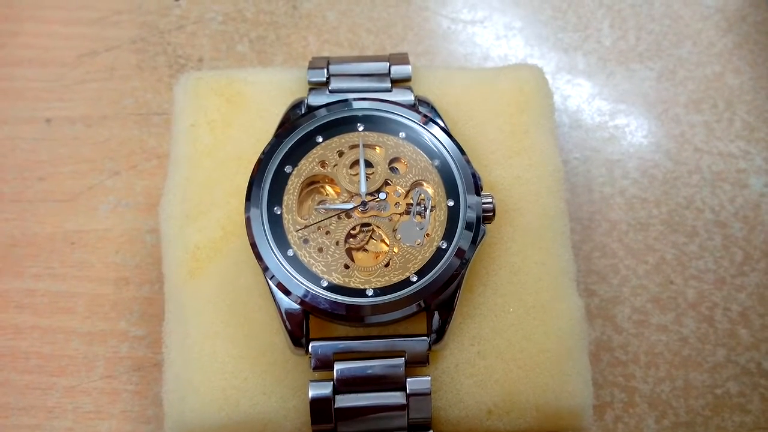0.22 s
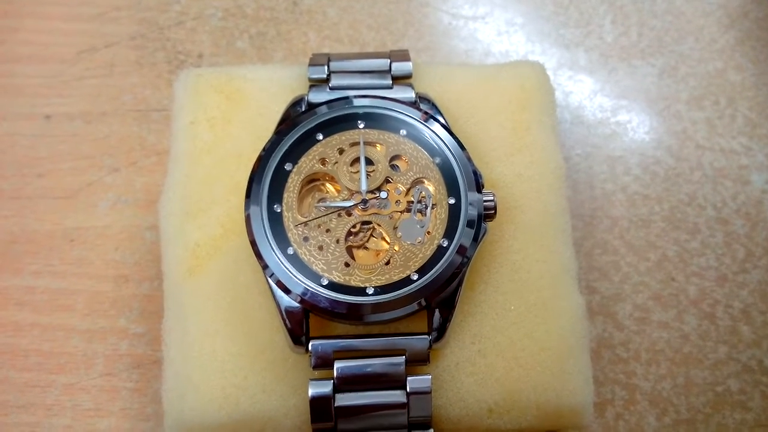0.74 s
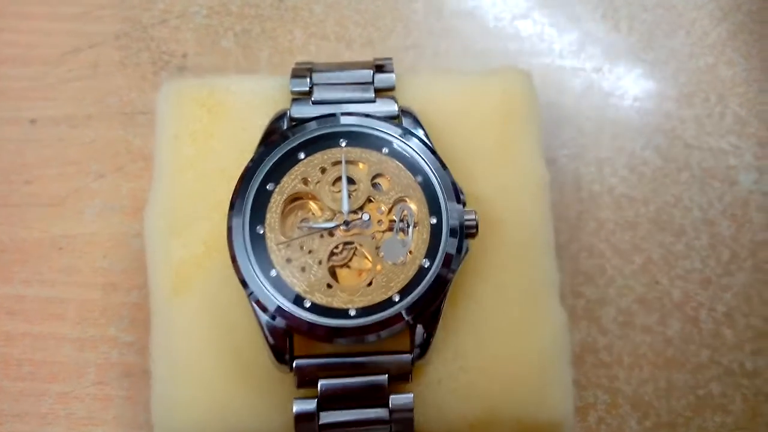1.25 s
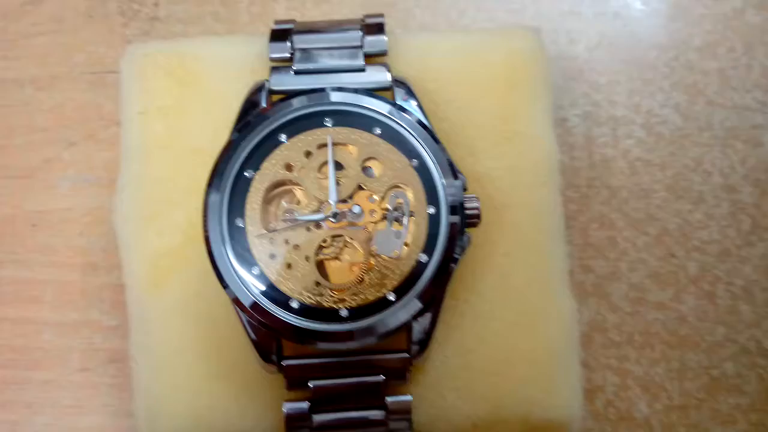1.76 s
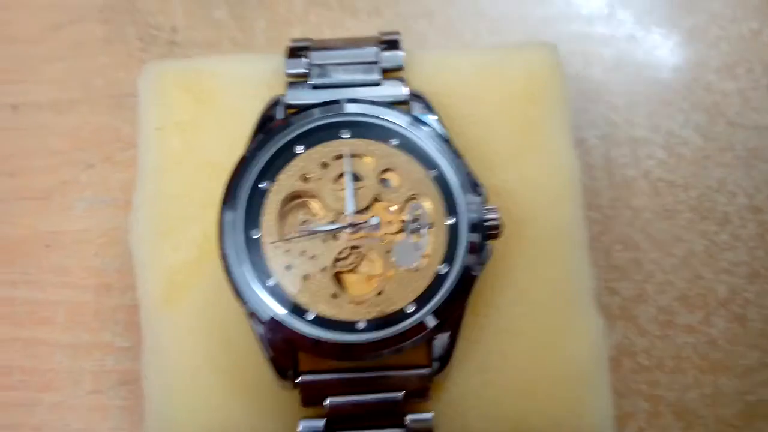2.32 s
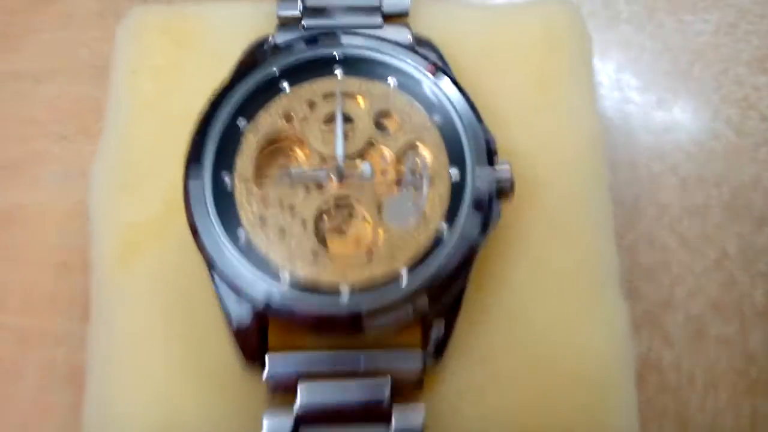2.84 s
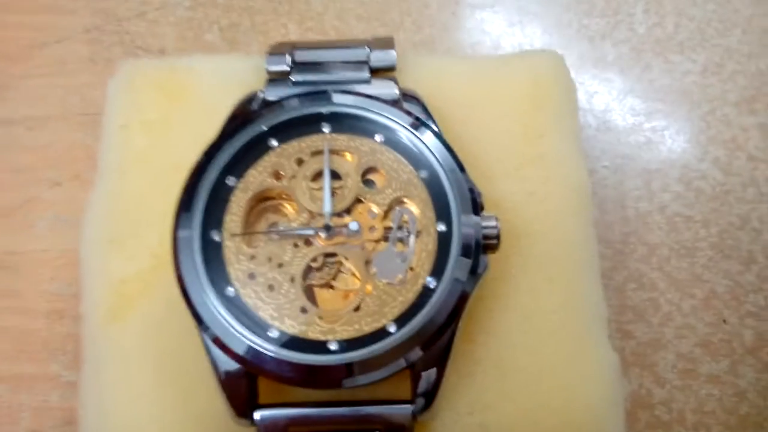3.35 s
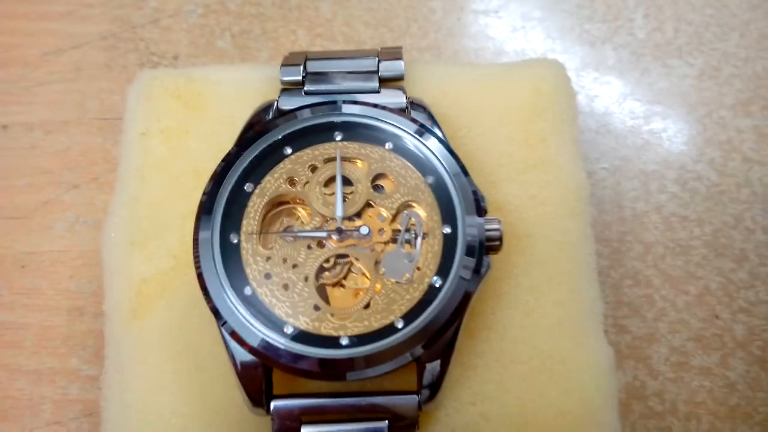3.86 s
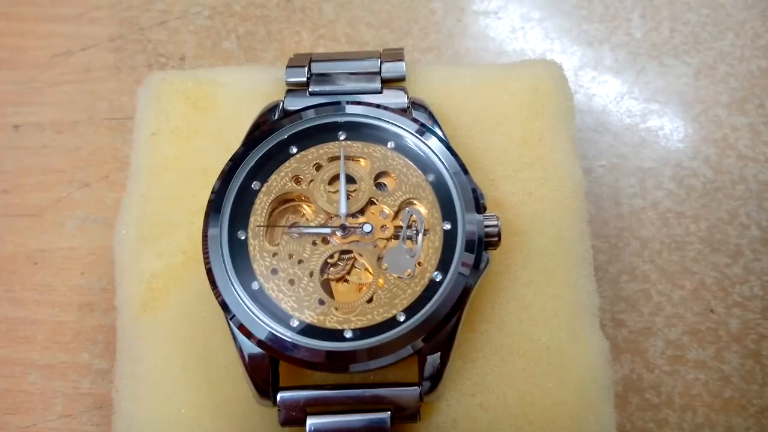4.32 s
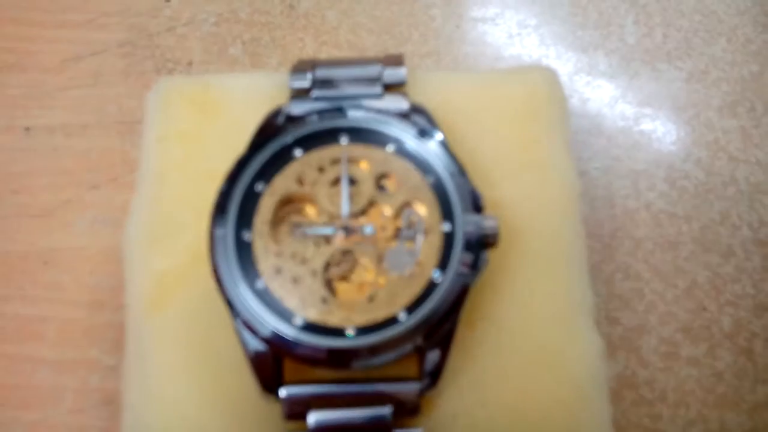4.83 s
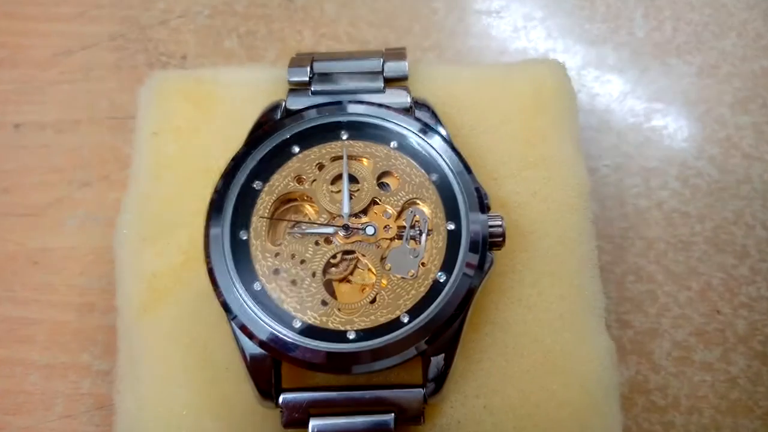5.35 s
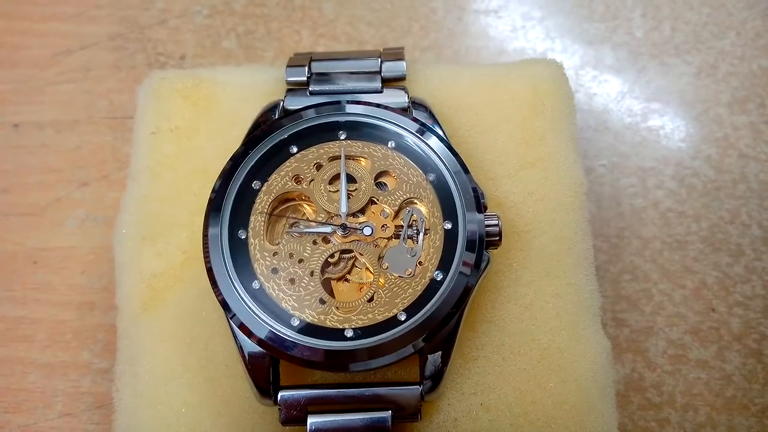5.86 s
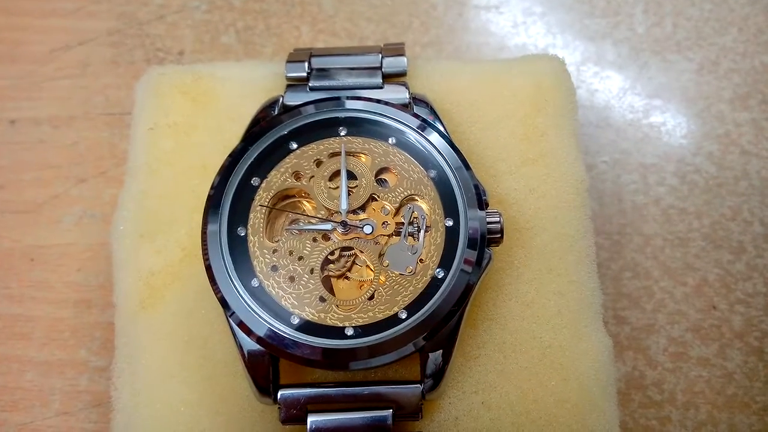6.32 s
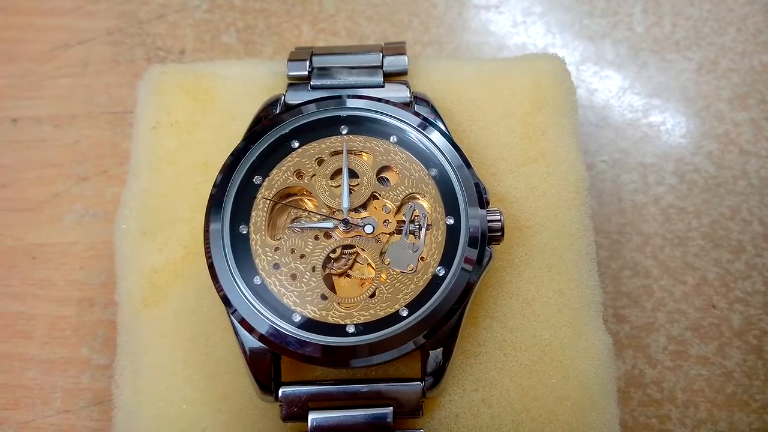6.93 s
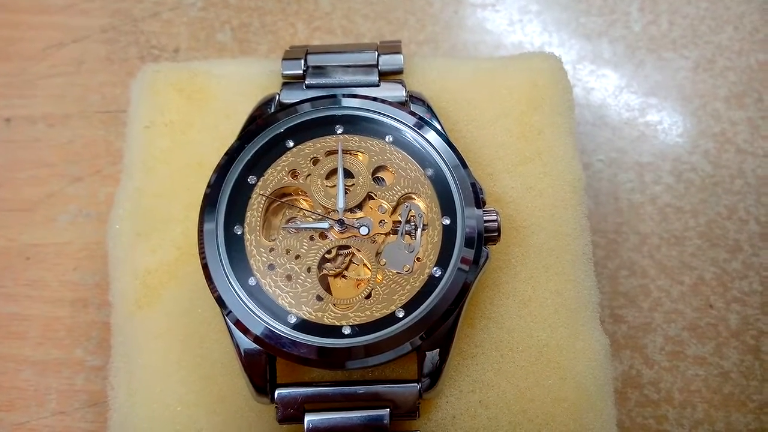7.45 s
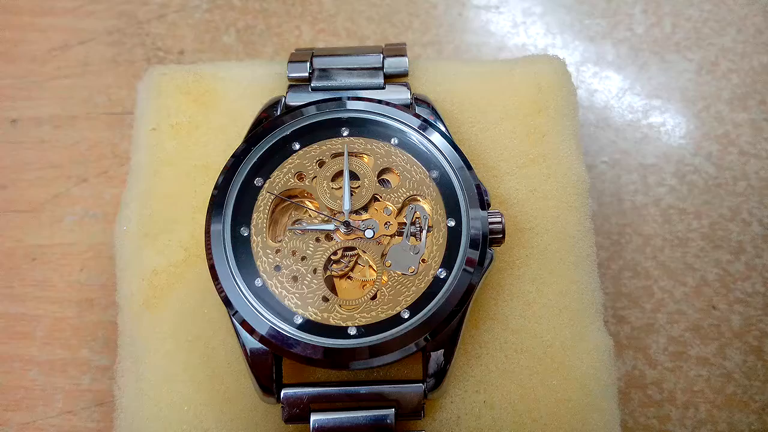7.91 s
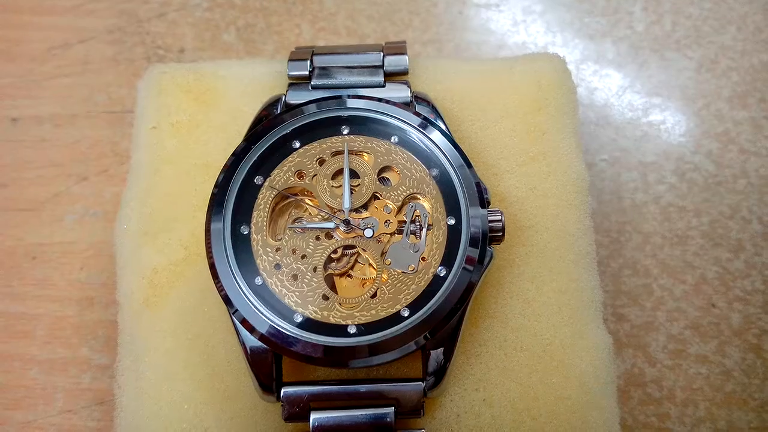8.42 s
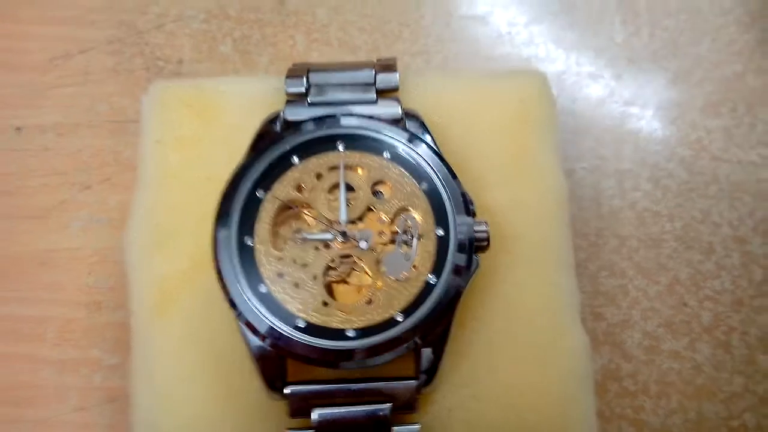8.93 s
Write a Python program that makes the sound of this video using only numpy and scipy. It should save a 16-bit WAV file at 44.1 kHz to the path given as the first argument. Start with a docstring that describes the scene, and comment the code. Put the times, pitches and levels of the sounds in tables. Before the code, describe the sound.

In a quiet room with faint low hum and hiss, a wristwatch is heard very close, ticking fast and evenly. The thin, bright clicks alternate between stronger and lighter, with a tiny rattle of wheels between them. Early on, faint high tones and a soft rustle swell and fade. One weak, distant knock comes shortly before the end while the ticking carries on.

```python
"""From the start a wristwatch on a foam pad, right under the microphone, beats five times a second over
room hum and hiss. In each beat the lever unlocks, pushes the balance and locks again; case, dial and a
few high tones ring briefly, tick and tock in different colours. Between beats the balance swishes and
the wheels rattle. In the first three seconds faint high tones swell and fade and a soft rustle passes.
At 8.4 s something is knocked once far off."""
import sys
import numpy as np
from scipy import signal
from scipy.fft import rfft, irfft, next_fast_len
from scipy.io import wavfile
from scipy.ndimage import uniform_filter1d, map_coordinates

SR = 44100
rng = np.random.default_rng(int(sys.argv[2]) if len(sys.argv) > 2 else 0)


def dump_mix(stems):
    """Bounce the given channels to the path in sys.argv[1] as a 16-bit WAV at rate SR."""
    frames = np.atleast_2d(stems).T  # one column per channel
    limited = np.clip(frames, -1, 1)  # hard clip at full scale
    pcm = np.round(limited * 32767).astype(np.int16)
    wavfile.write(sys.argv[1], SR, pcm)


N = 404838

# beats, tick and tock in turn: lock t/s, then level/dB of body, treble, push, ring, dial
BEATS = [(0.0375, -33.5, -39.5, -55, -56, -61), (0.2335, -45.5, -41, -53, -60, -68),
         (0.4369, -30.5, -43, -49, -48, -69), (0.632, -46.0, -52, -49.5, -62, -57),
         (0.836, -33, -37, -53, -55, -81), (1.0322, -40, -43.5, -53.5, -51, -71),
         (1.2356, -43, -42, -48, -50, -62), (1.4317, -38.5, -42.5, -52, -55, -64),
         (1.6347, -30, -40.5, -52, -64, -58), (1.832, -46.5, -41.5, -49.5, -49, -58),
         (2.0337, -31.0, -41, -48, -56, -75), (2.231, -44.5, -44.5, -53, -54.0, -61),
         (2.4327, -35.5, -40.5, -44, -47, -58), (2.631, -45, -44.5, -52, -54, -59),
         (2.8332, -35, -39, -49, -50, -58), (3.029, -37.5, -41, -52.5, -51.5, -54),
         (3.2314, -30.5, -40.5, -48.5, -56.0, -76), (3.428, -42, -41.5, -51, -58, -60),
         (3.6303, -31.5, -38.5, -50, -48.5, -55), (3.828, -35.5, -36.5, -50.5, -58, -57),
         (4.0307, -30, -40, -48, -51, -77), (4.227, -45, -42, -51.5, -54, -54),
         (4.4305, -31.5, -41, -51, -52.0, -76), (4.6252, -40.5, -38.5, -53.5, -49, -58),
         (4.8291, -28.5, -40.0, -48.5, -47, -48.5), (5.025, -44, -42, -51, -53, -57),
         (5.2287, -31, -39.0, -46, -51, -62), (5.4255, -44, -42, -51.5, -48, -49.5),
         (5.6289, -31.5, -39, -55, -67, -57), (5.801, -36.5, -42, -54, -60, -59),
         (6.0052, -31, -37, -51, -55, -53), (6.2018, -42, -39, -51.5, -68, -57),
         (6.4047, -30, -40, -50, -50, -61), (6.6, -36.5, -42.5, -53, -60, -55),
         (6.804, -32.5, -38.5, -49.5, -56, -77), (7, -36.5, -40, -52, -51, -56),
         (7.2038, -31, -39, -50, -57, -55), (7.3994, -38, -42.5, -48.5, -67, -58),
         (7.6025, -29.5, -38.5, -50, -61, -66), (7.7986, -37.5, -38.5, -53.5, -65, -51),
         (8.001, -29.5, -38.5, -49, -57, -63), (8.198, -43, -40.5, -52, -49, -58),
         (8.4, -32, -42, -46, -54, -68), (8.5973, -44, -38.5, -52.5, -62, -58),
         (8.7996, -32.5, -44.5, -50, -56, -60), (8.9963, -36, -38, -53.5, -55, -53)]
# unlock, push, drop: tick lead/s, level/dB re push, tock lead/s, level/dB re push
LIGHT_CONTACTS = [(.0343, -17.5, .0343, -3.5), (0.022, -1, .0188, 3), (.0088, -9, 0.015, -10)]
# treble lift of the light contacts: tick/dB, tock/dB
LIGHT_BRIGHT_DB = [9.5, 1]
# lock rebound re first blow: tick ratio, tock ratio
LOCK_CHATTER = [.45, .8]
# brief ringing tones after each lock, including a faint high ping near 11.6 kHz:
# f/Hz, spread/Hz, level/dB re the beat's ring level, t60/s
RING_TONES = [(3140, 25, -11.5, .13), (3530, 50, -9.5, .12), (4220, 60, -9.5, .12), (6480, 70, -5.5, .085),
              (7435, 9, 3, .11), (8170, 50, -7.5, .062), (11600, 500, -17.5, .055)]

def escapement():
    """Three light contacts, then the loud lock, followed by brief ringing tones."""
    out = np.zeros(N)
    highpass = lambda hz: np.clip((hz - 6100) / 600, 0, 1)
    for k, (lock_s, body_db, treble_db, push_db, ring_db, _) in enumerate(BEATS):
        side = k % 2
        for row in LIGHT_CONTACTS:
            lead_s, db = np.reshape(row, (2, 2))[side]
            light = case_response(side, LIGHT_BRIGHT_DB[side], scatter_db=2)
            touch = contact(light, chatter=3, t60_s=.007, rise_s=.0012)
            touch_s = lock_s - lead_s + rng.normal(0, .0002)
            add(out, touch_s, amp(push_db + db + rng.normal(0, 2.4)) * touch)
        hard = case_response(side, bright_db=0, scatter_db=.6)
        lock = contact(hard, chatter=LOCK_CHATTER[side], t60_s=.0055, rise_s=.0006)
        snap = contact(hard, chatter=1, t60_s=.006, rise_s=.0006)  # small rebounds are bright
        body = unit_click(lock - filtered(lock, highpass))
        treble = unit_click(filtered(snap, highpass))
        add(out, lock_s, amp(body_db) * body + amp(treble_db) * treble)
        for hz, spread_hz, db, t60_s in RING_TONES:
            gain = amp(ring_db + db + rng.normal(0, 4))
            add(out, lock_s, gain * ring(rng.normal(hz, spread_hz), t60_s, rise_s=.00057))
    return out


def contact(response, chatter, t60_s, rise_s):
    """A jewel hits steel and chatters for a moment."""
    force = noise_burst(SR // 100, t60_s, rise_s)
    force *= chatter / np.linalg.norm(force)
    force[0] += 1  # first blow
    return unit_click(signal.fftconvolve(force, response))


# case and plate resonances: f/Hz, width/Hz, relative tick level/dB, relative tock level/dB
CASE_MODES = [(3683, 130, -17.5, -14), (4170, 370, -22.5, -20), (5010, 380, -10, -14),
              (5510, 540, 0.5, -5.5), (5900, 500, -5, -8), (6720, 440, -14, -17), (7060, 440, -6.5, -6),
              (7390, 660, -13.5, -9), (8134, 260, -19.5, -21.5), (9670, 2200, -42, -34),
              (11110, 900, -32.5, -26), (11800, 900, -28.5, -26.5), (15080, 260, -37, -37)]

def case_response(side, bright_db, scatter_db, size=2048):
    """Impulse response of the case through one pallet (0 tick, 1 tock); each blow reweights the modes."""
    hz = np.fft.rfftfreq(size, 1 / SR)
    power = 0
    for centre_hz, width_hz, *levels_db in CASE_MODES:
        peak = amp(levels_db[side] + rng.normal(0, scatter_db))
        power += (peak / (1 + np.abs(2 * (hz - centre_hz) / width_hz) ** 3)) ** 2
    floor = amp(-41.5) / (1 + (hz / 11000) ** 8)
    gain = np.sqrt(power + floor ** 2) * amp(bright_db * np.clip((hz - 6000) / 900, 0, 1))
    cepstrum = irfft(np.log(gain))
    cepstrum[1:size // 2] *= 2  # fold to minimum phase
    cepstrum[size // 2 + 1:] = 0
    return irfft(np.exp(rfft(cepstrum)))


def dial(build_s=.018, t60_s=.16):
    """The dial's diffuse ring builds through the light contacts and dies after the lock."""
    t = np.arange(-SR // 10, SR // 5) / SR
    shape = np.exp(np.minimum(t, 0) / build_s) * amp(-60 * np.maximum(t, 0) / t60_s)
    envelope = np.zeros(N)
    for lock_s, *_, dial_db in BEATS:
        add(envelope, lock_s + t[0], amp(dial_db - 7) * shape)
    return envelope * narrow_noise(hz=1925, width_hz=110, size=N)


# teeth on the pallets: tick lead/s, relative level/dB, tock lead/s, relative level/dB, rise/s
PALLET_SLIPS = [(0.022, -54.5, 0.0296, -54.5, 0.0026), (0.012, -56, 0.016, -50, 0.004),
                (0.0029, -53.5, 0.0026, -55, 0.0031)]
# three-beat mesh cycle of the wheels: relative swish level/dB, relative rattle level/dB
MESH_CYCLE = [(-65, -54), (-67, -48.5), (-79, -87)]
# friction spectrum: f/Hz, relative density/dB
SLIDE_SPECTRUM = [(1500, -43), (3100, -11), (3420, -10), (3600, 1.5), (3950, -4), (4250, -6.5), (4600, -12),
                  (6600, -13.5), (7500, -9), (8300, -28), (12000, -75)]

def slide_and_rattle(locks_s):
    """Teeth slide over the pallets before each lock; after it the wheels rattle in their play."""
    t = np.arange(SR // 5) / SR
    pressure, taps = np.zeros(N), np.zeros(N)
    for k, lock_s in enumerate(locks_s):
        for *row, rise_s in PALLET_SLIPS:
            lead_s, db = np.reshape(row, (2, 2))[k % 2]
            add(pressure, lock_s - lead_s, amp(db + 2 + rng.normal()) * swell(t, rise_s))
        add(pressure, lock_s, amp(-64) * swell(t, rise_s=.022))  # the wheel train settles
        _, rattle_db = MESH_CYCLE[k % len(MESH_CYCLE)]
        lag_s = .073 + .0027 * lock_s  # grows as the wheels turn
        rattle_s = lock_s + lag_s + rng.normal(0, .0013)
        add(pressure, rattle_s, amp(rattle_db - 9) * swell(t, rise_s=.015))
        tap_gain = amp(rattle_db - 4)
        add(taps, rattle_s, tap_gain * ring(rng.normal(3620, 110), t60_s=.066, rise_s=.003))
        second_tap_s = rattle_s + rng.uniform(0, .043)
        add(taps, second_tap_s, tap_gain * ring(rng.normal(4150, 134), t60_s=.035, rise_s=.001))
    grain = unit(amp(1.6 * wobble(350)))  # surfaces catch and slip
    return taps + pressure * grain * noise(SLIDE_SPECTRUM)


# clicks between beats: t/s, level/dB
WHEEL_CLICKS = [(.3135, -60), (0.913, -57), (2.4725, -62), (3.915, -56), (3.944, -56), (5.6965, -56),
                (6.897, -55), (7.497, -54), (8.0975, -56), (8.6985, -54)]

def wheel_clicks():
    """A tooth drops through its play against its neighbour: a tiny, dull click."""
    out = np.zeros(N)
    for start_s, db in WHEEL_CLICKS:
        light = case_response(side=1, bright_db=3, scatter_db=3)
        add(out, start_s, amp(db) * contact(light, chatter=4, t60_s=.011, rise_s=.001))
    return filtered(out, lambda hz: 1 / (1 + (hz / 8000) ** 16))


# swinging balance: f/Hz, relative density/dB
SWISH_SPECTRUM = [(2000, -2), (3300, 10), (4400, 10), (5400, 3.5), (6150, 6.5), (6950, -6), (7480, 6.5),
                  (7950, -15), (8500, -45), (12000, -57)]

def balance_swish(locks_s):
    """The balance and its spring brush softly through each swing."""
    swing = signal.windows.tukey(SR // 5, .5)
    speed = np.zeros(N)
    for k, lock_s in enumerate(locks_s):
        swish_db, _ = MESH_CYCLE[k % len(MESH_CYCLE)]
        tick_lift_db = [2.5, 0][k % 2]
        add(speed, lock_s - .003, amp(swish_db + tick_lift_db) * swing)
    return speed * patchy(noise(SWISH_SPECTRUM), depth_db=0)


def desk_reflection(watch):
    """The desk answers the watch with a short diffuse tail."""
    tail = noise_burst(SR // 2, t60_s=.091, rise_s=.00092)
    return signal.fftconvolve(watch, tail / np.linalg.norm(tail))[:N]


# modes of the knocked object: f/Hz, width/Hz, level/dB, t60/s
KNOCK_MODES = [(1162, 21, -46.5, .3), (1165, 45, -57.5, 1), (1950, 100, -64, 0.6), (2320, 240, -63, 0.91),
               (2970, 120, -62, .5)]

def far_knock(start_s=8.402, rise_s=.0036, tail_t60_s=.55):
    """Something hard is knocked; the room smears its modes into narrow noise and adds a tail."""
    t = np.arange(SR) / SR
    modes = sum(amp(db - 60 * t / t60_s) * narrow_noise(hz, width_hz, len(t))
                for hz, width_hz, db, t60_s in KNOCK_MODES)
    tail_hz_db = [(300, -7), (750, 4), (1150, -1), (1700, 0), (2400, -13), (4000, 2),
                  (7000, -28), (9000, -70)]
    tail = noise(tail_hz_db)[:len(t)] * amp(-53 - 60 * t / tail_t60_s)
    out = np.zeros(N)
    add(out, start_s, (modes + tail) * (1 - np.exp(-t / rise_s)))
    return out


# rustle spectrum: f/Hz, relative density/dB
RUSTLE_SPECTRUM = [(2000, -22), (3300, -17), (4400, -12), (5400, -5), (6200, 14), (7400, 3), (8100, 4),
                   (8700, -28), (12000, -34)]
# rustle envelope: t/s, level/dB
RUSTLE_LEVEL = [(.5, -91), (.9, -78), (1.35, -62.5), (1.7, -92), (2.05, -60.5), (2.3, -68), (2.5, -56.5),
                (2.7, -71), (2.95, -60.5), (3.4, -95)]

def rustle():
    """A soft rustle, like a hand shifting its grip, swells and fades."""
    brush = patchy(noise(RUSTLE_SPECTRUM), depth_db=2.2)
    return amp(level_db(RUSTLE_LEVEL) + 1.2 * wobble(24.6)) * brush


# faint high tones: t/s, rise/s, f/Hz, sag/(Hz/s), level/dB, flutter depth re steady tone
WHISTLES = [(-.08, .19, 4490, 70, -67, 1), (1.69, .25, 4462, 55, -62, .8), (.17, .13, 3165, 0, -66, 3)]

def whistles():
    """Thin, fluttering tones swell and fade; two sag in pitch."""
    out = np.zeros(N)
    t = np.arange(2 * SR) / SR
    for start_s, rise_s, hz, sag_hz_per_s, db, depth in WHISTLES:
        flutter = 1 + depth * (wobble(140, len(t)) + 1j * wobble(140, len(t)))
        tone = np.exp(2j * np.pi * (hz - sag_hz_per_s * t / 2) * t)
        add(out, start_s, amp(db) * unit(np.real(flutter * tone)) * swell(t, rise_s))
    return out


# room noise spectra: f/Hz, relative density/dB
RUMBLE_SPECTRUM = [(20, -10.5), (31, -6), (41, -13.5), (52, -14.5), (66, 0.5), (95, -1.5), (150, -3),
                   (220, -3.5), (310, -4), (440, -9.5), (590, -9.5), (750, -14), (1000, -30), (1800, -88)]
MIDRANGE_SPECTRUM = [(600, -12.5), (900, 7), (1150, 2.5), (1350, 0), (1560, 0.5), (1800, -12.5),
                     (2400, -29), (4000, -41)]
# room noise envelopes: t/s, level/dB (midrange before its trim)
RUMBLE_LEVEL = [(0, -52), (1.1, -51.5), (2.2, -53.5), (4.6, -52.5), (5.8, -51), (6.8, -53.5), (8.45, -50.5),
                (9.18, -52.5)]
MIDRANGE_LEVEL = [(0.0, -67.5), (1.0, -70.5), (2.12, -73), (7.59, -65), (8.28, -72), (8.54, -66.5),
                  (9.18, -72.5)]

def room_noise(midrange_trim_db=.67):
    """The room's low rumble and fainter midrange drift in level."""
    rumble = patchy(noise(RUMBLE_SPECTRUM), depth_db=2)
    midrange = amp(midrange_trim_db) * patchy(noise(MIDRANGE_SPECTRUM), depth_db=2)
    return amp(level_db(RUMBLE_LEVEL)) * rumble + amp(level_db(MIDRANGE_LEVEL)) * midrange


# hum tones: f/Hz, relative level/dB, phase wander/rad
HUM_TONES = [(65.6, -59, 0.67), (111, -65, 2), (130.5, -68, 1.04), (175.8, -62.5, 1.3), (311, -67, 1.7),
             (589.6, -70, 0.48)]

def room_hum():
    """Low tones waver in level and phase."""
    t = np.arange(N) / SR
    out = np.zeros(N)
    for hz, db, wander_rad in HUM_TONES:
        peak = np.sqrt(2) * amp(db - 2 + 2.4 * wobble(8))
        out += peak * np.sin(2 * np.pi * hz * t + wander_rad * wobble(9))
    return out


# hiss spectrum: f/Hz, relative density/dB
HISS_SPECTRUM = [(700, -7), (1500, 1.5), (2100, 2), (2800, 2), (3500, 5.5), (4200, -0.5), (4800, 0),
                 (6200, 5), (7450, -1.5), (7850, -22), (8300, -36), (15500, -47)]
# peaks in the hiss: f/Hz, width/Hz, lift/dB
HISS_BANDS = [(1530, 110, 3), (1960, 110, 3), (2410, 120, 3.5), (3140, 100, 4), (3530, 90, 3.5),
              (4280, 260, 4)]

def microphone_hiss():
    """Broad hiss with a few narrow bands standing out."""
    bands = lambda f: amp(sum(db / (1 + (2 * (f - hz) / width_hz) ** 4)
                              for hz, width_hz, db in HISS_BANDS))
    return amp(-63.5) * patchy(filtered(noise(HISS_SPECTRUM), bands), depth_db=2.8)


def amp(db):
    """Decibels to gain."""
    return 10 ** (np.asarray(db) / 20)


def unit(x):
    """Scale to rms 1."""
    return x / np.sqrt(np.mean(x ** 2) + 1e-20)


def unit_click(click):
    """Scale to the energy of 10 ms at rms 1."""
    return click * np.sqrt(SR / 100) / np.linalg.norm(click)


def level_db(curve):
    """A (t/s, level/dB) curve at every sample."""
    return np.interp(np.arange(N) / SR, *np.transpose(curve))


def swell(t, rise_s):
    """Envelope that peaks at 1 after rise_s."""
    return t / rise_s * np.exp(1 - t / rise_s)


def add(track, start_s, sound):
    """Mix a sound into the track."""
    i = round(start_s * SR)
    sound, i = sound[max(0, -i):], max(0, i)
    part = track[i:i + len(sound)]
    part += sound[:len(part)]


def filtered(x, response):
    """Apply a gain given as a function of f/Hz."""
    size = next_fast_len(x.shape[-1] + 8192)
    gain = response(np.fft.rfftfreq(size, 1 / SR))
    return irfft(rfft(x, size) * gain, size)[..., :x.shape[-1]]


def ring(hz, t60_s, rise_s):
    """One decaying tone."""
    t = np.arange(SR // 8) / SR
    return np.sqrt(2) * np.sin(2 * np.pi * hz * t) * amp(-60 * t / t60_s) * (1 - np.exp(-t / rise_s))


def noise(spectrum):
    """Noise of rms 1 coloured by (f/Hz, density/dB) points."""
    points_hz, db = np.transpose(spectrum)
    colour = lambda hz: amp(np.interp(np.log(hz + 1), np.log(points_hz), db))
    return unit(filtered(rng.standard_normal(N), colour))


def noise_burst(size, t60_s, rise_s):
    """White noise that rises and decays."""
    t = np.arange(size) / SR
    return rng.standard_normal(size) * amp(-60 * t / t60_s) * (1 - np.exp(-t / rise_s))


def narrow_noise(hz, width_hz, size):
    """A smeared resonance of rms 1."""
    return unit(filtered(rng.standard_normal(size), lambda f: 1 / (1 + (2 * (f - hz) / width_hz) ** 2)))


def wobble(rate_hz, size=N):
    """A smooth curve through random knots."""
    knots = rng.standard_normal(int(size * rate_hz / SR) + 4)
    return map_coordinates(knots, [np.arange(size) * rate_hz / SR])


def patchy(x, depth_db):
    """Slow random gain patches in time and frequency; output rms 1."""
    spectra = signal.stft(x, nperseg=512)[2]
    field = uniform_filter1d(rng.standard_normal(spectra.shape), size=4, axis=0)
    field = uniform_filter1d(field, size=18, axis=1)
    return unit(signal.istft(spectra * amp(depth_db * unit(field)), nperseg=512)[1][:N])


def scene():
    """The close watch in a quiet room; both channels alike."""
    locks_s = np.array(BEATS)[:, 0]
    watch = escapement() + dial() + slide_and_rattle(locks_s) + wheel_clicks()
    mono = watch + amp(-25) * desk_reflection(watch) + balance_swish(locks_s)
    mono += rustle() + whistles() + far_knock()
    mono += room_noise() + microphone_hiss() + room_hum()
    return np.array([mono, mono])


def record(dry):
    """Band limit at 16.1 kHz."""
    return filtered(dry, lambda hz: hz < 16100)


dry = scene()
out = record(dry)
dump_mix(out)
```